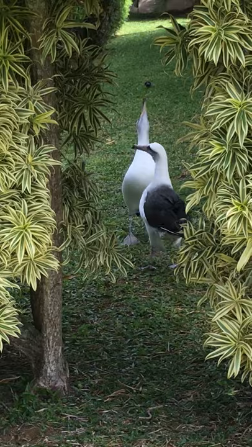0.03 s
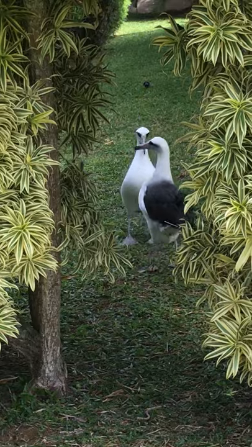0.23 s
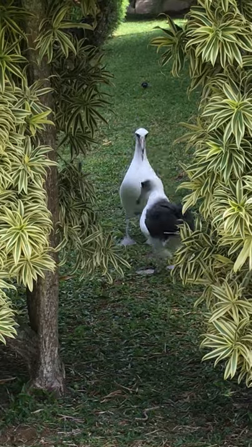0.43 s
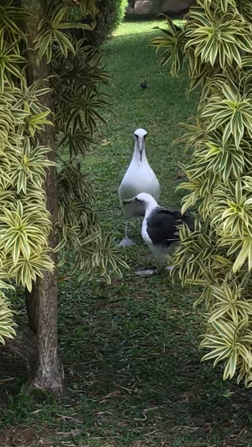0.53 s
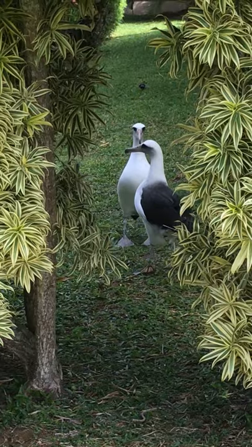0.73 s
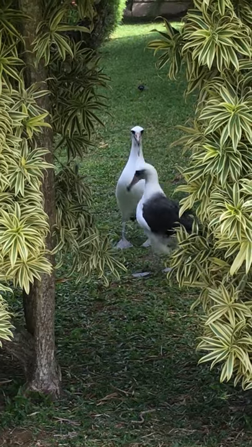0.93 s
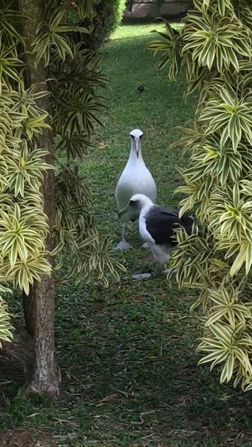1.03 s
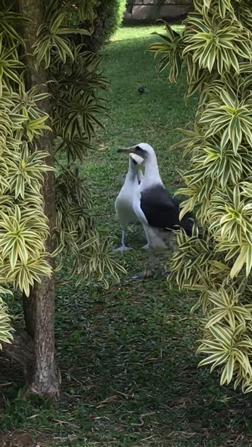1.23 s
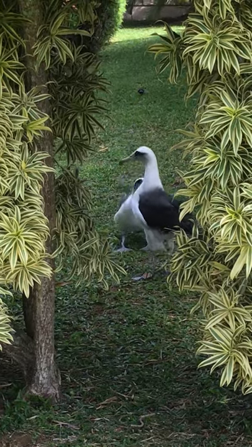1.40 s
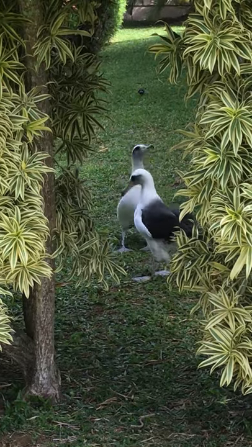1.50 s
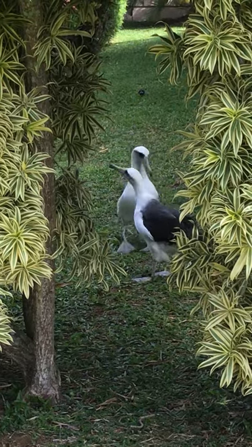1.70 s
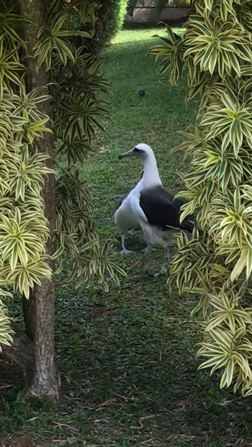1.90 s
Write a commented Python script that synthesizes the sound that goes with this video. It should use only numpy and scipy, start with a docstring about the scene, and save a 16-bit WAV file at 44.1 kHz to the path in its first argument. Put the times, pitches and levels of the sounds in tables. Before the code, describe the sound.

An albatross rapidly claps its bill in a run of dry, hollow clacks outdoors.

```python
"""Soft bill clicks over a faint low rumble, then an albatross on the lawn in front of the microphone
claps its bill seventeen times, slowing a little as it goes. Each clack is a dry snap of the horny
bill edges and a hollow knock of the mouth; garden walls and trees throw it back.
Afterwards a small bird whistles far off."""
import sys
import numpy as np
from scipy import signal
from scipy.fft import rfft, irfft
from scipy.io import wavfile
from scipy.ndimage import uniform_filter1d

SR = 44100
rng = np.random.default_rng(int(sys.argv[2]) if len(sys.argv) > 2 else 0)


def transcribe(u):
    """Save the signal u as a 16-bit wav file named by the first command-line argument.

    u: samples, shape (n,) or (channels, n), limited to [-1, 1]; the rate is SR.
    q: integer samples, one column per channel.
    """
    v = np.clip(np.atleast_2d(u).T, -1, 1)
    q = np.round(v * 32767).astype(np.int16)
    wavfile.write(sys.argv[1], SR, q)


N = 85995


def amp(db):
    """Decibels to gain."""
    return 10 ** (np.asarray(db) / 20)


def unit_rms(x):
    """Scales to rms 1."""
    return x / np.sqrt(np.mean(x ** 2) + 1e-20)


def curve(points, hz, column=1):
    """Reads one column of a table along log frequency."""
    table = np.array(points)
    return np.interp(np.log(hz + 1), np.log(table[:, 0] + 1), table[:, column])


def add(mix, start_s, sound):
    """Mixes a sound in at its start time."""
    part = mix[max(round(start_s * SR), 0):][:len(sound)]
    part += sound[:len(part)]


def noise(spectrum, size, tilt_db=0):
    """Noise of rms 1 with a given spectrum, tilted per octave."""
    hz = np.fft.rfftfreq(size, 1 / SR)
    colour = amp(curve(spectrum, hz) + tilt_db * np.log2(hz + 1))
    return unit_rms(irfft(rfft(rng.standard_normal(size)) * colour, size))


def fade(t, t60):
    """Exponential decay, 60 dB down after t60 seconds."""
    return np.exp(-np.log(1000) * t / t60)


def burst(spectrum, rise_s, t60, tilt_db=0):
    """Coloured noise that swells and dies away."""
    t = np.arange(8192) / SR
    envelope = np.minimum(t / rise_s, 1) * fade(np.maximum(t - rise_s, 0), t60)
    return envelope * noise(spectrum, len(t), tilt_db)


def background():
    """The open air around the microphone: a slowly swelling low rumble and a soft hiss."""
    # Colour of the rumble and of the hiss. Each row: frequency in Hz, relative level in dB.
    rumble_colour = [(12, -51), (20, -28), (45, -5), (75, 0), (150, -6.5), (196, -10), (216, -9.5),
                     (258, -13.5), (400, -22), (520, -84), (880, -120)]
    hiss_colour = [(200, -3), (400, 3.5), (1000, 2.5), (2000, -4.5), (4000, -9.5), (6000, -14.5),
                   (8000, -18.5), (12000, -22.5), (16500, -23.5), (19000, -38)]
    # How each rises and falls. Each row: time in seconds, gain in dB.
    rumble_swell = [(.12, 0.5), (.25, -0.5), (.5, -1.5), (.73, 0.5), (.95, -2.5), (1.2, -1.5), (1.45, -1),
                    (1.66, 0), (1.85, -2.5)]
    hiss_swell = [(.1, -59), (.35, -61.5), (1.0, -51), (1.55, -60), (1.9, -60.5)]
    t = np.arange(N) / SR
    rumble = amp(np.interp(t, *np.transpose(rumble_swell)) - 50.5) * noise(rumble_colour, N)
    hiss = amp(np.interp(t, *np.transpose(hiss_swell))) * noise(hiss_colour, N)
    return rumble + hiss


def nibble(db, rise_s, t60, tilt_db):
    """A light touch of the bill edges: a brief scratchy click."""
    # Colour of the touch. Each row: frequency in Hz, relative level in dB.
    colour = [(500, -10), (950, 1), (1500, -3.5), (2550, -16), (3200, -6), (4300, -3), (5000, -5.5),
              (5600, -1), (8000, -12.5), (12000, -18), (17000, -26)]
    return amp(db) * burst(colour, rise_s, t60, tilt_db)


def edge_snap():
    """The bill edges meet: the same clean click below, a gritty burst of a few milliseconds above."""
    # Colour of the horny edges. Each row: frequency in Hz, relative level in dB.
    edge_colour = [(300, 0), (1400, 8), (2300, -6.5), (3200, -4), (4000, -1.5), (5500, -2.5), (7500, -9),
                   (8400, -10.5), (10000, -11.5), (12500, -9.5), (16500, -24), (18500, -7)]
    clean_below_hz, smooth_hz = 2400, 420
    t, hz = np.arange(2048) / SR, np.fft.rfftfreq(2048, 1 / SR)
    grit = rfft(rng.standard_normal(len(t)) * fade(t, t60=.0105))
    power = uniform_filter1d(abs(grit) ** 2, size=round(smooth_hz / hz[1]))
    clean_share = 1 / (1 + (hz / clean_below_hz) ** 6)
    spectrum = np.sqrt(clean_share) + np.sqrt((1 - clean_share) / power) * grit
    # Minimum phase keeps the attack sharp.
    log_gain = np.log(unit_rms(amp(curve(edge_colour, hz))))
    mirrored = np.r_[log_gain, log_gain[-2:0:-1]]
    colour = np.exp(np.conj(signal.hilbert(mirrored)))[:len(hz)]
    return amp(-30.5) * irfft(spectrum * colour * np.sqrt(power.mean())) * (1 - t / t[-1])


def mouth_knock(t):
    """The air in the closing mouth gives a short hollow knock."""
    # Air resonances. Each row: frequency in Hz, level in dB, time to swell in seconds.
    resonances = [(1216, -18.5, 0.00099), (726, -35.5, 0.0006), (426, -38, 0.00076)]
    roundness, top_hz = 1.25, 1302  # higher roundness: a rounder swell and a quicker stop
    shift_s = .00048  # offsets the low-pass delay so knock and snap sound together
    knock = np.zeros(len(t))
    for k, (hz, db, swell_s) in enumerate(resonances):
        envelope = (t / swell_s * np.exp(1 - t / swell_s)) ** roundness
        knock += (-1) ** k * amp(db) * envelope * np.cos(2 * np.pi * hz * t)
    knock = signal.sosfilt(signal.butter(6, top_hz, fs=SR, output="sos"), knock)
    return np.interp(t + shift_s, t, knock)


def shell_ring(t):
    """The struck bill shell rings, tuned a little differently at each clap."""
    # Modes of the shell. Each row: frequency in Hz, level in dB, t60 in seconds.
    modes = [(2464, -47, 0.015), (2900, -59, 0.006), (3190, -48.5, 0.0066), (4774, -47, 0.021),
             (5710, -33.5, 0.0062), (6660, -40.5, 0.0067), (8540, -47, 0.0027)]
    detune, rise_s = 1 + .012 * rng.standard_normal(), .0003
    ring = sum((-1) ** k * amp(db) * fade(t, t60) * np.sin(2 * np.pi * hz * detune * t)
               for k, (hz, db, t60) in enumerate(modes))
    return ring * np.minimum(t / rise_s, 1)


def clap(knock_db, shell_db, snap_db):
    """One clack as it leaves the bill: snap, knock and ring together."""
    snap = edge_snap()
    t = np.arange(len(snap)) / SR
    return amp(knock_db) * mouth_knock(t) + amp(shell_db) * shell_ring(t) + amp(snap_db) * snap


def rasp():
    """A short woody rasp that swells just behind the knock."""
    # Colour of the rasp. Each row: frequency in Hz, relative level in dB.
    colour = [(1200, -35), (1500, 5.5), (1800, -4), (2080, 1), (2400, -32)]
    return amp(-44.5) * burst(colour, rise_s=.0083, t60=.052)


def woody_tones():
    """Faint woody tones that hang on after every clap."""
    # Each row: frequency in Hz, level in dB, t60 in seconds.
    tones = [(630, -52, .25), (680, -58, .25), (800, -52, .3), (1238, -52, .4), (1275, -48, .45),
             (1335, -50, .3), (1362, -47, .35), (1500, -54, .22), (1665, -51.5, .22), (1804, -53, .2),
             (2043, -54, .15)]
    t = np.arange(SR // 2) / SR
    return sum(amp(db) * fade(t, t60) * np.sin(2 * np.pi * hz * t) for hz, db, t60 in tones)


def echoes(sound):
    """Nearby trunks and walls send distinct, slightly dulled reflections to the microphone."""
    # Each row: delay in seconds, gain in dB.
    reflections = [(.00388, -15), (.00458, -20.5), (.00619, -14.5), (.00683, -22), (.00782, -15),
                   (.00896, -23), (.01045, -21), (.01272, -18.5), (.01481, -20.5), (.01878, -11.5),
                   (.02283, -21.5), (.02909, -17), (.03238, -17.5), (.03821, -22), (.04349, -22.5),
                   (.04717, -17), (.05018, -17.5), (.06542, -24.5), (.07134, -21), (.08712, -21.5)]
    dull = signal.lfilter(*signal.butter(1, 2100, fs=SR), sound)
    returned = np.zeros(N)
    for delay_s, db in reflections:
        add(returned, delay_s, amp(db) * dull)
    return returned


def paths():
    """Countless small reflections of random sign: frequencies, times and short-time spectra."""
    return signal.stft(rng.choice([-1., 1.], SR // 2), SR, nperseg=256)


def scatter(sound, bands, steady_paths):
    """A diffuse tail, each band with its own level and decay; long waves keep the steady paths."""
    steady_below_hz = 2550
    hz, t, fresh_paths = paths()
    steady_share = 1 / (1 + (hz[:, None] / steady_below_hz) ** 4)
    blend = np.sqrt(steady_share) * steady_paths + np.sqrt(1 - steady_share) * fresh_paths
    t60 = curve(bands, hz, column=2)[:, None]
    decay = fade(t, t60) * np.sqrt(2 * np.log(1000) / (t60 * SR))  # equal energy for any t60
    tail = blend * amp(curve(bands, hz))[:, None] * decay
    return signal.fftconvolve(sound, signal.istft(tail, SR, nperseg=256)[1])


def whistle(length_s, start_hz, end_hz, db, waver):
    """A small bird far off: a thin, slightly wavering glide."""
    progress = np.arange(0, length_s, 1 / SR) / length_s
    wobble = unit_rms(uniform_filter1d(rng.standard_normal(SR), size=90))[:len(progress)]
    hz = (start_hz + (end_hz - start_hz) * progress) * (1 + waver * wobble)
    envelope = np.sqrt(abs(np.sin(np.pi * progress)))
    return amp(db) * envelope * np.sin(2 * np.pi * np.cumsum(hz) / SR)


def scene():
    """Both birds from one spot in the garden; as the head moves, leaves scatter each clack's treble anew."""
    # Soft clicks and scrapes. Each row: start in seconds, level in dB, rise and t60 in seconds,
    # treble tilt in dB per octave.
    nibbles = [(.1768, -41.5, 0.00012, .004, 3), (.1776, -43.5, 0.00015, .022, -1.5),
               (.1921, -47, 0.00029, .007, 1), (.194, -44.5, 0.00037, .014, -2),
               (.205, -43, .0004, 0.006, 0), (.207, -41.5, 0.00059, 0.017, 3.5),
               (.2108, -51, .0004, 0.011, -4.5), (.343, -60.5, 0.0092, .065, 10),
               (1.339, -47, 0.0015, 0.077, -3)]
    # Bill claps. Each row: start in seconds, then gains in dB for knock, shell, snap and rasp.
    claps = [(.4303, 1.3, 1.5, 1.5, -2), (.4844, -1, -1, -1, -6), (.5376, 1, 2, 2, -3),
             (.5909, .7, 3.5, 1, -6), (.6436, -.2, 2, 0, -7), (.698, -.7, 1.5, -1.5, -8),
             (.7543, -.2, -2.5, -1, -4), (.8108, 0, -6, .5, 0), (.8667, -2.2, -10, -2, 1),
             (.9238, -1.8, -9, -1.5, 1), (.9813, -2, -10, -2, -1), (1.0392, -1.6, -9, -.5, 1),
             (1.0979, -.3, -3.5, .5, -2), (1.1555, -.7, -2.5, -1.5, -6), (1.2151, -.9, -2, -1, -5),
             (1.275, -.9, -9, -1, -1), (1.3338, -.9, -7, -1, 0)]
    # The far bird. Each row: start and length in seconds, first and last pitch in Hz, level in dB,
    # waver as a share of the pitch.
    whistles = [(1.415, 0.056, 4350, 4235, -66, 0.047), (1.792, 0.036, 5700, 6200, -66, 0.021),
                (1.84, .062, 4030, 4070, -66.5, .008), (1.893, 0.076, 4080, 4580, -61, 0.022),
                (1.905, .055, 3330, 3450, -67, .02)]
    # Scatter from leaves close by, and the garden's longer tail.
    # Each row: frequency in Hz, gain in dB, t60 in seconds.
    leaves = [(300, -5.5, 0.12), (704, -8, 0.027), (1140, -29.5, 0.045), (1440, -0.5, 0.12),
              (1700, 5.5, .06), (3480, 4.5, 0.084), (5500, -7, 0.07), (8700, -4, 0.13), (16000, -18, .07)]
    garden = [(253, -16, 0.24), (642, 6, 0.14), (885, -5, 0.17), (1100, -29.5, 1), (1320, -5, 0.53),
              (1740, -2.5, 0.5), (2500, 6, 0.37), (4030, -4, 0.64), (5800, -8.5, 0.34), (8900, -11, 0.5),
              (16000, -18, 0.2)]
    leaves_delay_s, garden_delay_s = .0032, .012
    bill, far_bird, space = np.zeros((3, N))
    leaf_paths, garden_paths = paths()[2], paths()[2]
    for start_s, knock_db, shell_db, snap_db, rasp_db in claps:
        clack = clap(knock_db, shell_db, snap_db)
        add(bill, start_s, clack)
        add(space, start_s, amp(rasp_db) * rasp())
        add(space, start_s + leaves_delay_s, scatter(clack, leaves, leaf_paths))
        add(space, start_s + leaves_delay_s, amp(knock_db) * woody_tones())
    for start_s, *touch in nibbles:
        click = nibble(*touch)
        add(bill, start_s, click)
        add(space, start_s + leaves_delay_s, amp(-4) * scatter(click, leaves, leaf_paths))
    for start_s, *glide in whistles:
        add(far_bird, start_s, whistle(*glide))
    add(space, garden_delay_s, scatter(bill + amp(2) * far_bird, garden, garden_paths))
    return (bill + echoes(bill) + far_bird + space + background())[None]


def record(dry):
    """One microphone, opened after a moment of silence; the top treble rolls off, then stops."""
    open_s, rolloff_hz, limit_hz = .082, 17000, 19200
    opened = dry * np.clip((np.arange(N) / SR - open_s) / .002, 0, 1)
    soft = signal.sosfilt(signal.butter(4, rolloff_hz, fs=SR, output="sos"), opened)
    band_limit = signal.firwin(511, limit_hz, window=("kaiser", 9), fs=SR)
    return signal.oaconvolve(soft, band_limit[None], "same")


dry = scene()
out = record(dry)
transcribe(out)
```